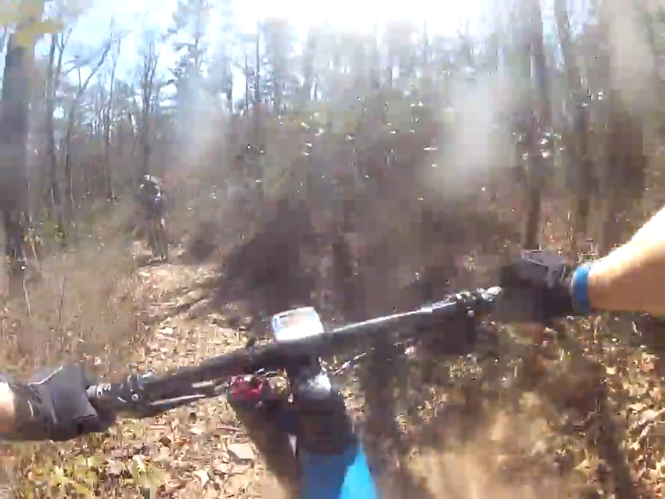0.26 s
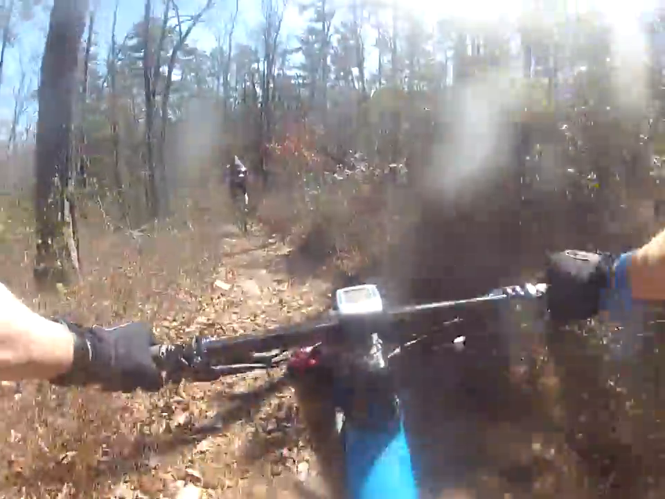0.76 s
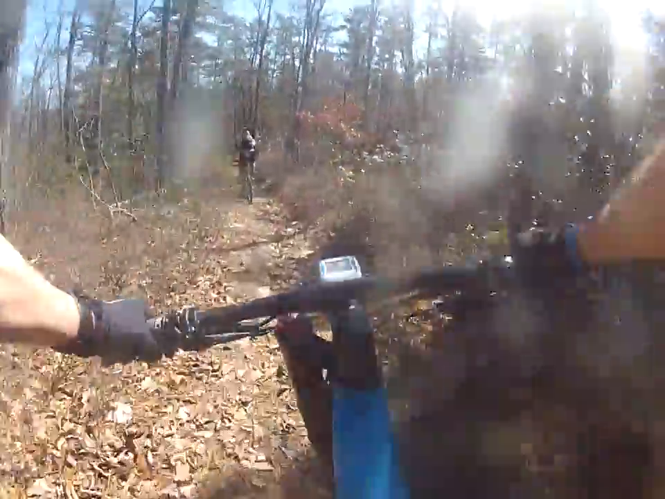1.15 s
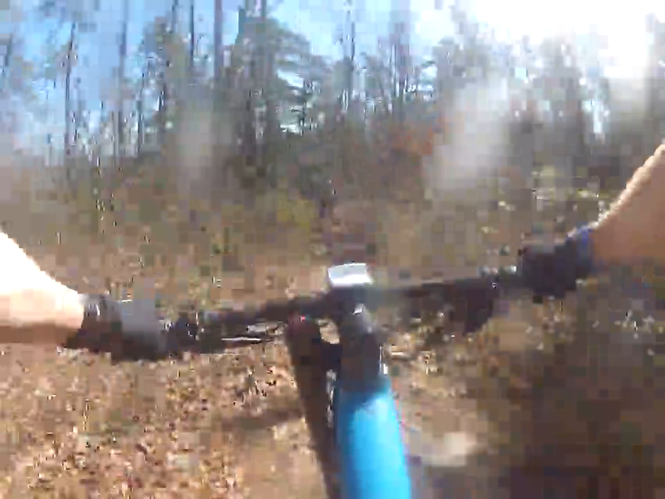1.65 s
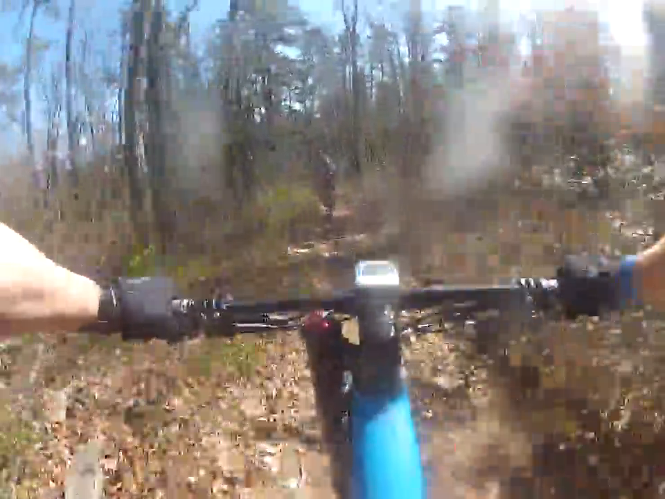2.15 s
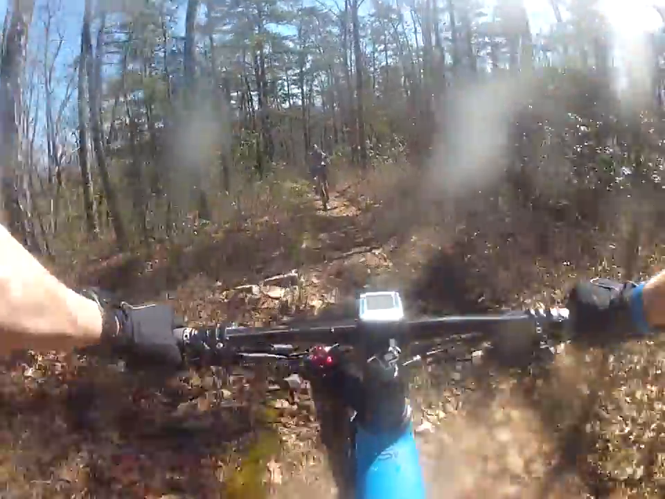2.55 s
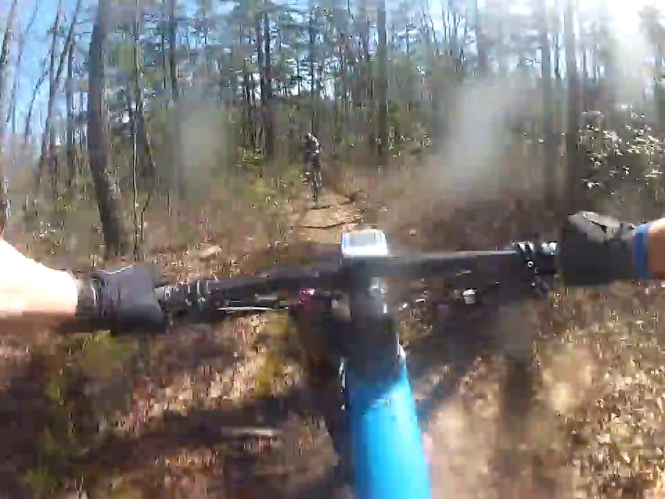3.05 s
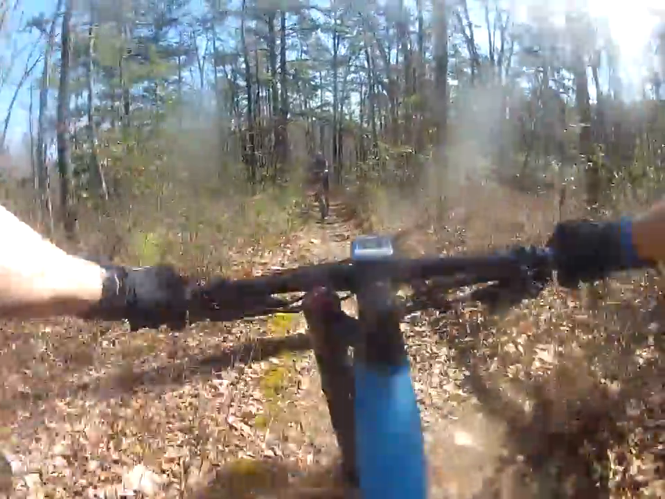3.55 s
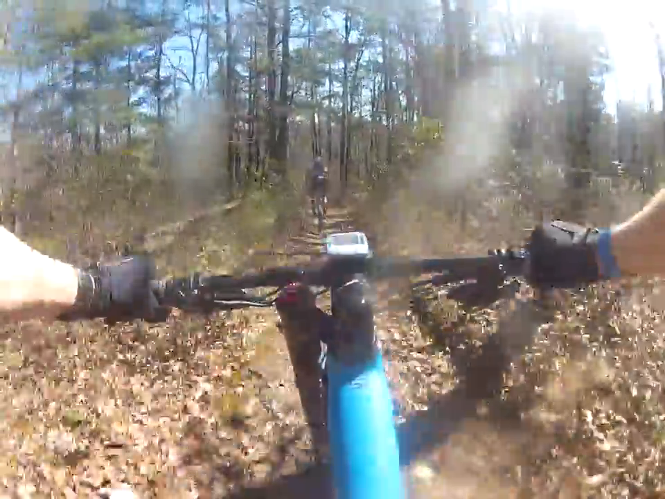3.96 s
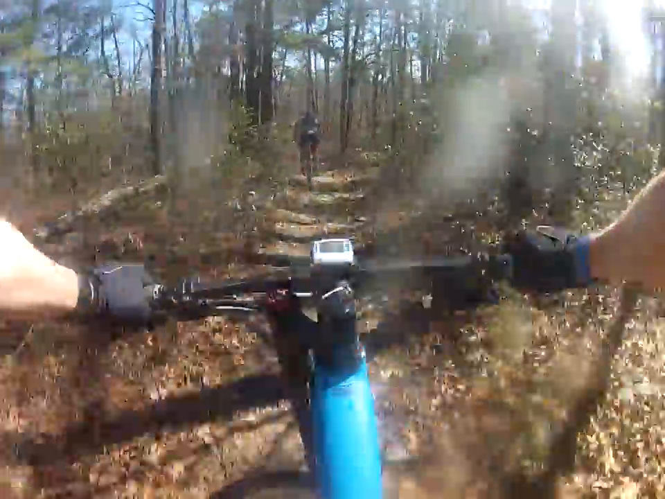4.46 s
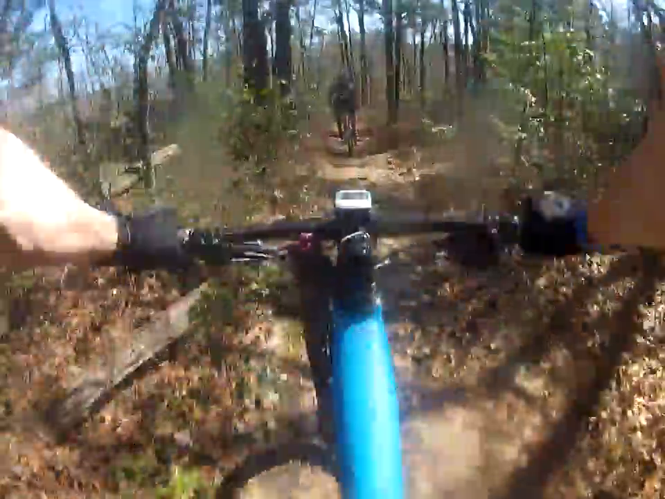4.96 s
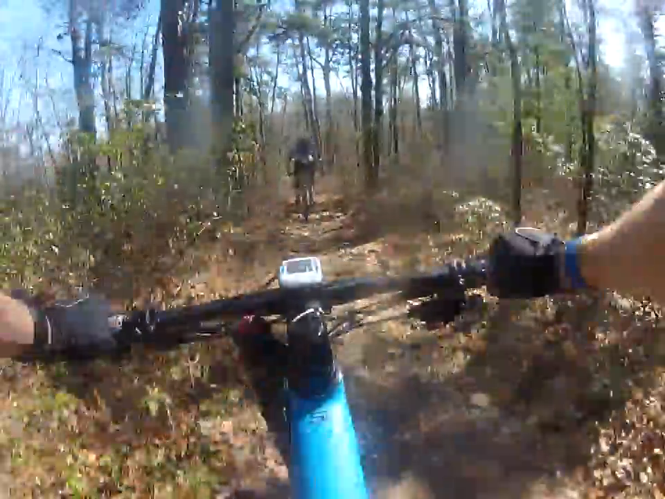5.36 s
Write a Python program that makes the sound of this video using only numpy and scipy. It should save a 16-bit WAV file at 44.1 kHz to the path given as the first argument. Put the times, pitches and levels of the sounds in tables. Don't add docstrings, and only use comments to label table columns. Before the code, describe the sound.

Boxy, dull, close outdoor sound: tyre rumble shakes a plastic shell around the microphone, with leaf crunch and brief snaps of twigs, grit and chain. Loud knocks cluster in the first half second, followed by a lighter, uneven roll. Low lumpy wind grows from 1.5 s; jolts and gusts thicken after 3 s, with a firm thump at 4.5 s and a tiny faint rub near the end.

```python
import sys
import numpy as np
from scipy import signal
from scipy.io import wavfile
from scipy.ndimage import uniform_filter1d

SR = 44100
rng = np.random.default_rng(int(sys.argv[2]) if len(sys.argv) > 2 else 0)


def how_loud(loudness_db):
    steps = np.asarray(loudness_db, float) / 20
    return 10 ** steps


def dump_mix(stems):
    frames = np.atleast_2d(stems).T
    limited = np.clip(frames, -1, 1)
    pcm = np.round(limited * 32767).astype(np.int16)
    wavfile.write(sys.argv[1], SR, pcm)


N = 247386


def unit(x):
    return x / np.sqrt(np.mean(x ** 2) + 1e-20)


def in_time(rows):
    s, *columns = np.transpose(rows)
    return [np.interp(np.arange(N) / SR, s, column) for column in columns]


def swells(rows):
    s, *rises, length = np.transpose(rows)
    coarse_t = np.arange(0, N, 40)[:, None] / SR
    shape = np.exp(-(2 * (coarse_t - s) / length) ** 2)
    return [np.interp(np.arange(N) / 40, np.arange(len(shape)), shape @ rise) for rise in rises]


def cut(x, hz, kind, order=2):
    return signal.sosfilt(signal.butter(order, hz, kind, fs=SR, output="sos"), x)


def drift(rate):
    r = np.exp(-40 * np.pi * rate / SR)
    noise = rng.standard_normal(N // 20 + 2002)
    slow = signal.lfilter([1], [1, -2 * r, r * r], noise)[2000:]
    return np.interp(np.arange(N) / 20, np.arange(len(slow)), unit(slow))


def grains(per_s, spread_db):
    sizes = how_loud(spread_db * np.minimum(rng.exponential(1, N), 4)) * rng.choice([-1, 1], N)
    return sizes * (rng.random(N) < per_s / SR) + 1e-18


def ring(clicks, hz, t60):
    r, w = how_loud(-60 / (t60 * SR)), 2 * np.pi * hz / SR
    return signal.lfilter([0, np.sin(w)], [1, -2 * r * np.cos(w), r * r], clicks)


# [t/s, stoniness level/dB, crunch level/dB, hardness/dB per octave]
TRAIL = [(0, -24.5, -37, -11), (.1, -31.5, -40, -1.5), (.3, -32.5, -39.5, 3), (.42, -30.5, -38, -1),
         (.8, -32.5, -44, -2), (1.05, -30, -41.5, -3), (1.4, -31.5, -43.5, -3), (1.6, -25.5, -43, -1),
         (2.0, -30, -47.5, -4.5), (2.5, -26, -46, 3.5), (2.8, -21.5, -43, 0), (3.2, -24.5, -41.5, 2),
         (3.8, -27, -42.5, 2), (4.05, -22, -40.5, -1), (4.6, -25, -38, -1), (4.95, -24.5, -42, 0),
         (5.4, -25.5, -39.5, 1.5), (5.61, -24.5, -37.5, -1)]
# [t/s at the crest,
# rumble rise/dB, crunch rise/dB, length/s]
BUMPS = [(.37, -3.5, -5.5, 0.14), (.45, 14.5, 3, 0.032), (.5, -4.5, -8, 0.12), (.585, 9.5, 6.5, 0.02),
         (.82, -11, 0.5, .05), (.89, 6, 0.5, 0.085), (1.1, 3, -4, 0.048), (1.25, 5, 0.5, 0.046),
         (1.55, 3.5, -2, 0.13), (1.7, 8, -0.5, .06), (1.87, 5, -3, 0.047), (2.11, 6.5, -1.5, 0.042),
         (2.22, 7.5, -1.5, 0.059), (2.39, 9, 0.5, 0.051), (2.51, -9, 4.5, 0.027), (2.7, 2.5, 0.5, 0.13),
         (2.9, -1.5, 2, 0.021), (2.96, 4.5, 0, 0.1), (3.01, -11, 0, 0.058), (3.05, 10, 0, 0.024),
         (3.26, -1, -6.5, 0.063), (3.64, 5.5, -1, 0.051), (3.86, 3, 1, .06), (4.0, 2.5, 3, 0.028),
         (4.17, -2.5, 1.5, 0.028), (4.39, -6.5, -1.5, 0.061), (4.43, 7, 0, 0.035), (4.97, -1, 4, 0.019),
         (5.22, -13, 0, 0.05), (5.55, 8.5, 0, 0.017)]


def trail():
    stones_db, crunch_db, hard_db = in_time(TRAIL)
    rumble_rise, crunch_rise = swells(BUMPS)
    return stones_db + rumble_rise, hard_db, crunch_db, crunch_rise


# [f/Hz, level/dB, t60/s]
SHELL = [(273.3, 2.5, 0.054), (353.4, -5, 0.04), (458.6, -0.5, 0.025), (614.6, -1, 0.028),
         (678, -2.5, 0.018), (1120, -19, 0.04)]


def rumble(level_db, bright_db):
    bunched = how_loud(4.5 * np.tanh(0.25 * drift(42) + 0.5 * drift(67.5)))
    shaken = np.zeros(N)
    for hz, db, t60 in SHELL:
        contacts = grains(600, spread_db=2.5) * bunched
        shaken += how_loud(db + bright_db * np.log2(hz / 400)) * ring(contacts, hz, 0.91 * t60)
    return how_loud(level_db - 1.0) * unit(cut(shaken, 1610, "low", order=3)), bunched


# [t/s, peak level/dB, share of the upper modes/dB per octave]
JOLTS = [(0.033, -16, -7), (0.175, -10.5, -2), (0.181, -14, 16), (0.201, -12, 18), (0.257, -20.5, 5),
         (2.888, -22, 0), (0.328, -12, 8), (0.442, 0.5, -2.5), (0.568, -23.5, 4), (0.646, -18.5, 28),
         (0.86, -11, 0.5), (1.872, -10, -30), (2.381, -26, -16), (1.526, -19, 7), (2.62, -10, -22),
         (3.036, -12.5, 14), (3.094, -15.5, 22), (3.216, -17.5, 4), (3.451, -14, -31), (3.543, -14, 12),
         (3.683, -13, -29), (3.852, -14, -20), (3.977, -10, -7), (4.073, -12.5, 17), (4.124, -11.5, 8),
         (4.424, -10.5, -26), (4.778, -14.5, -15), (4.968, -8, 2), (5.114, -12.5, 3), (5.239, -12.5, 0)]
# [t/s, peak level/dB, share of the upper modes/dB per octave]
DAMPED = [
    (.397, -7, -12),
    (.410, -8, -5),
]


def jolts():
    out = np.zeros(N)
    span = np.arange(round(.15 * SR))
    push = np.exp(-((span / SR - .0030) / 0.00035) ** 2)
    push = cut(push, 320, "high")
    for rows, stretch in ((JOLTS, 0.88), (DAMPED, 0.54)):
        for s, peak_db, upper_db in rows:
            hit = np.zeros(len(span))
            for hz, db, t60 in SHELL:
                mode_db = db + upper_db * np.log2(hz / 400) + rng.normal(0, 2.0)
                hit += how_loud(mode_db) * ring(push, hz, t60 * stretch)
            at = round(s * SR)
            out[at:at + len(span)] -= (how_loud(peak_db) * hit / np.abs(hit).max())[:N - at]
    return out


# [t/s at the crest, length/s, level/dB]
AFTERSHAKE = [
    (.288, .025, -23),
    (.52, .11, -31),
]


def quiver():
    t, swell = np.arange(N) / SR, np.zeros(N)
    for s, length, db in AFTERSHAKE:
        swell += how_loud(db) * np.exp(-(2 * (t - s) / length) ** 4)
    hz, _, t60 = SHELL[0]
    ringing = ring(grains(400, spread_db=2), hz, t60)
    return swell * unit(ring(ringing, hz, t60 / 4))


# [f/Hz, width/Hz, level/dB]
CAVITY = [(1134, 170, -5.5), (1995, 358, -0.5), (2894, 435, 1), (3664, 530, -0.5), (4840, 607, 2.5)]


def cavity(x, dull_db, patches_db):
    out = 0
    for k, (hz, width, level_db) in enumerate(CAVITY):
        r = np.exp(-np.pi * width / SR)
        poles = [2, -4 * r * np.cos(2 * np.pi * hz / SR), 2 * r * r]
        peak = signal.lfilter([1 - r * r, 0, r * r - 1], poles, x)
        mode_db = level_db - dull_db * np.log2(hz / 2800) + patches_db[k]
        out = out + (-1) ** k * how_loud(mode_db) * peak
    return out


def crunch(level_db, bunched):
    crackle = unit(grains(2500 * how_loud(3.5 * drift(30)), spread_db=2.5) * bunched ** 1.1)
    hiss = rng.standard_normal(N) * how_loud(0.5 * drift(24))
    patches_db = [1.49 * drift(21.0) for _ in CAVITY]
    return how_loud(level_db + 0.5) * unit(cavity(0.65 * crackle + 0.76 * hiss, 3, patches_db))


# [t/s, peak level/dB, dullness/dB per octave]
SNAPS = [(0.026, -26, -5), (0.1328, -19.5, -8), (0.2, -15, 46), (0.2217, -14, -5), (0.2756, -26, 0),
         (0.302, -14.5, 6), (0.3267, -9.5, -1), (0.33, -9, 3), (0.4433, -14.5, 6), (0.535, -19, -17),
         (0.588, -14.5, -27), (0.677, -22.5, -8), (0.855, -18.5, 9), (0.898, -23.5, 16), (1.1805, -24, -22),
         (1.526, -18.5, 6.5), (2.364, -26.5, -6), (2.4487, -23, -20), (2.753, -20, 2), (5.4305, -22, 8),
         (2.894, -21, 23), (3.355, -24, 12), (3.9447, -22, 7.5), (3.9917, -11, 11.5), (4.82, -20.5, 22),
         (4.969, -18.5, 9), (5.108, -18.5, 16), (5.1784, -21.5, -15.5), (5.444, -19, -6),
         (5.533, -21.5, -15)]


def snaps():
    out, t = np.zeros(N), np.arange(round(.06 * SR)) / SR
    fade = np.minimum(t / 0.00148, 1) ** 2 * np.exp(-t / 0.002)
    for s, peak_db, dull_db in SNAPS:
        burst = rng.standard_normal(len(t)) * fade
        snap = cavity(burst, dull_db, rng.normal(0, 1.5, len(CAVITY)))
        at = round(s * SR)
        out[at:at + len(t)] += (how_loud(peak_db - 2.0) * snap / np.abs(snap).max())[:N - at]
    return out


# [t/s, level/dB, length/s]
SCUFFS = [
    (0.01, -35, 0.058),
    (0.569, -30.5, 0.051),
    (0.835, -36, 0.092),
    (1.492, -39.5, 0.057),
    (2.887, -35, 0.024),
    (2.945, -37, 0.044),
    (3.026, -37.5, 0.036),
    (3.923, -41, 0.058),
    (5.108, -36.5, 0.023),
]


def scuffs():
    t, swell = np.arange(N) / SR, np.zeros(N)
    for s, level_db, length in SCUFFS:
        swell += how_loud(level_db) * np.sin(np.pi * np.clip((t - s) / length, 0, 1) ** 0.56)
    leaves = cavity(grains(9000, spread_db=4), dull_db=0.5, patches_db=np.zeros(len(CAVITY)))
    return swell * unit(leaves)


# [t/s, length/s, f/Hz, level/dB]
SQUEAK = (5.485, .05, 2450, -38)


def squeak():
    s, length, hz, level_db = SQUEAK
    swell = np.sin(np.pi * np.clip((np.arange(N) / SR - s) / length, 0, 1))
    rubbed = ring(grains(4000, spread_db=10), hz, 0.0055)
    return how_loud(level_db) * swell * unit(ring(rubbed, hz, 0.0054))


# [t/s, level/dB]
AIRFLOW = [(0, -39.5), (.45, -42), (.63, -51), (.7, -33), (1.15, -48), (1.42, -35), (1.54, -22),
           (2.0, -22.5), (2.35, -19), (2.55, -21), (2.85, -18.5), (2.9, -28), (3.56, -33.5), (3.7, -21.5),
           (4.1, -38), (4.55, -28), (4.73, -35.5), (5.61, -30.5)]
# [t/s at the crest, buffeting rise/dB, heave rise/dB, length/s]
GUSTS = [(.43, -7, 6, .1), (.55, 1, -8, 0.2), (.85, 5, 2, 0.063), (.95, 15.5, 0, 0.037),
         (1.08, 11, 4, 0.059), (1.31, 1, 9, 0.088), (1.56, 4, 8, 0.072), (1.8, 4.5, -13, 0.21),
         (1.94, 7, 0, 0.077), (2.11, 7, -12, 0.13), (2.22, 4.5, -2, 0.044), (2.3, 9, 10, 0.033),
         (2.68, 5, 5, 0.14), (3.16, 9.5, 11, 0.04), (3.25, 3, 12, 0.11), (3.37, 13, -1, 0.089),
         (3.64, 12, 12, 0.16), (3.76, -2, 5, 0.078), (3.92, 0, 11, .12), (4.21, 2, 16.5, 0.15),
         (4.39, 7, 20, 0.039), (4.51, 6, 15, 0.067), (4.63, -1, 15, 0.1), (4.8, 3, -9, 0.079),
         (4.88, 6.5, 5, 0.18), (5.05, 9, 5, 0.13), (5.19, 11.5, 14, 0.093), (5.3, 2, 11.5, 0.13),
         (5.45, 8, 9.5, .12)]


def airflow():
    flow_db, = in_time(AIRFLOW)
    buffet_rise, heave_rise = swells(GUSTS)
    heave_db = -35 + 0.46 * (flow_db + 30) + heave_rise + 3.5 * drift(4.8)
    return flow_db + buffet_rise, heave_db


def wind(heave_db, buffet_db):
    heave = cut(cut(rng.standard_normal(N), 85, "low"), 36.4, "high", order=3)
    eddies = cut(cut(grains(900, spread_db=0.0), 152, "low", order=3), 86.0, "high")
    spray = cut(cut(grains(900, spread_db=3.5), 490, "low", order=4), 123, "high")
    spray = unit(spray * how_loud(2.5 * drift(30)))
    buffet = unit(eddies * how_loud(1.17 * drift(26.0))) + how_loud(-13.5) * spray
    return how_loud(heave_db) * unit(heave) + how_loud(buffet_db) * buffet


# [t/s, peak level/dB, width/s, direction 1 in or -1 out]
PUFFS = [
    (2.110, -8, .0015, 1),
    (2.293, -9, .0018, 1),
    (3.372, -13, .0015, 1),
    (4.188, -14, .0015, -1),
    (4.387, -9, .002, 1),
    (4.508, -2.5, .002, 1),
    (5.157, -12, .0015, -1),
    (5.447, -12, .0015, 1),
]


def puffs():
    t, out, calm = np.arange(N) / SR, np.zeros(N), np.ones(N)
    for s, peak_db, width, direction in PUFFS:
        out += direction * how_loud(peak_db) * np.exp(-((t - s) / width) ** 2)
        calm *= 1 - .8 * np.exp(-((t - s) / .012) ** 2)
    return cut(out + 1e-18, 50, "high"), calm


def scene():
    rumble_db, hard_db, crunch_db, crunch_rise = trail()
    buffet_db, heave_db = airflow()
    bright_db = hard_db - 0.38 * (buffet_db + 30) + 0.22 * crunch_rise
    shell, bunched = rumble(rumble_db, bright_db)
    tyres = crunch(crunch_db + crunch_rise, bunched) + snaps() + scuffs() + squeak()
    pushes, calm = puffs()
    air = wind(heave_db, buffet_db) * calm + pushes
    return (shell + jolts() + quiver() + tyres + air)[None]


def starve(x, floor_db, follow):
    hz, _, z = signal.stft(x, SR, nperseg=2048)
    power = np.abs(z[:, :1020]) ** 2 + 1e-20
    band_db = 10 * np.log10(power.reshape(1, 102, 10, -1).mean(axis=2))
    loud_db = uniform_filter1d(np.median(band_db, axis=1, keepdims=True), size=5)
    centre = hz[5:1020:10]
    rise_db = np.where(centre > 5000, .4 * (centre / 1000 - 6), -40)[:, None]
    threshold_db = floor_db + rise_db + follow * (loud_db - loud_db.mean())
    kept = band_db > threshold_db + rng.normal(0, 1.5, band_db.shape)
    z[:, :1020] *= np.repeat(kept, 10, axis=1)
    return signal.istft(z, nperseg=2048)[1][:, :N]


# [up, down to 12 kHz, times each sample is held, up, down to the file rate]
HELD_RATE = (40, 147, 4, 147, 160)


def held_samples(x):
    up, down, hold, up2, down2 = HELD_RATE
    held = np.repeat(signal.resample_poly(x, up, down, axis=1), hold, axis=1)
    steps = signal.resample_poly(held, up2, down2, axis=1)[:, :N]
    return signal.sosfilt(signal.cheby2(14, 26, 15250, fs=SR, output="sos"), steps)


def band_limit(x):
    return signal.sosfilt(signal.butter(12, 16460, fs=SR, output="sos"), x)


def record(dry):
    limited = dry / (1 + (dry / .72) ** 6) ** (1 / 6)
    steps = held_samples(cut(limited, 5470, "low", order=6))
    return band_limit(starve(steps, floor_db=-87.5, follow=0.38))


dry = scene()
out = record(dry)
dump_mix(out)
```